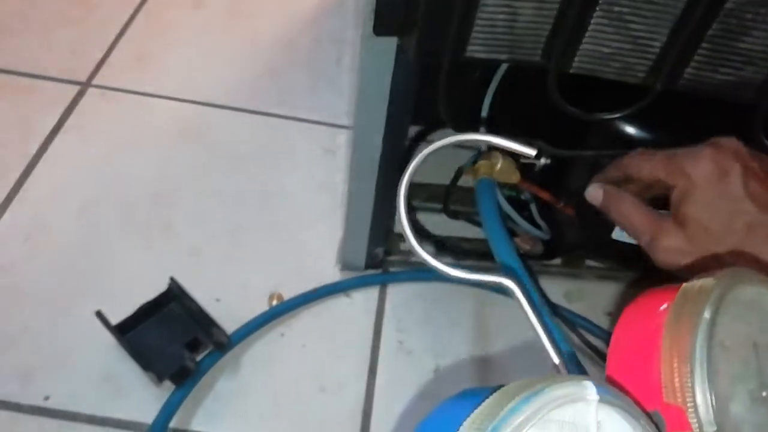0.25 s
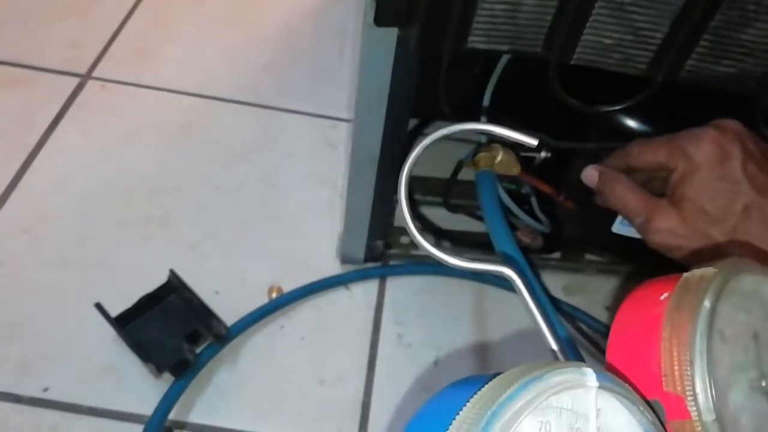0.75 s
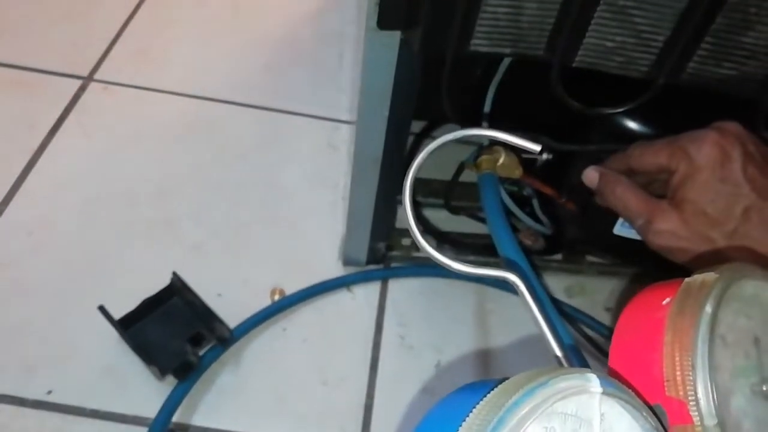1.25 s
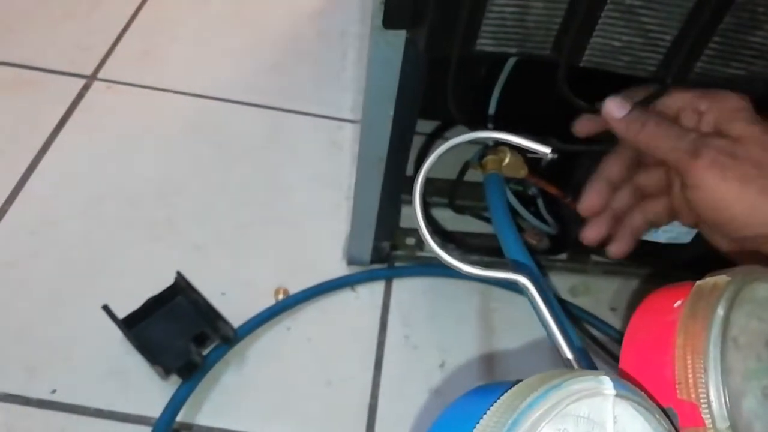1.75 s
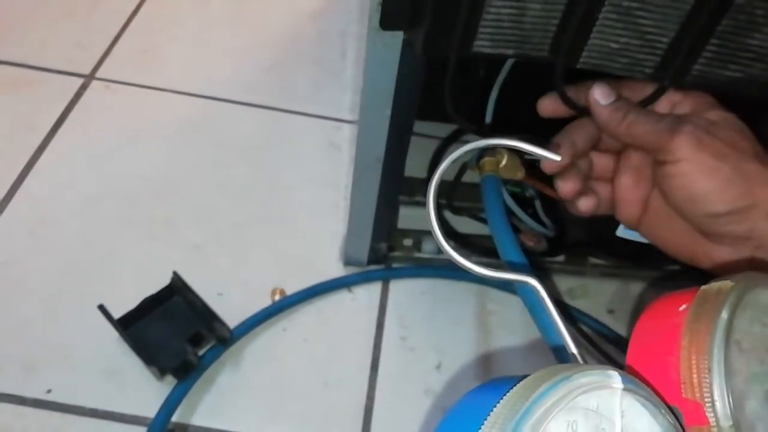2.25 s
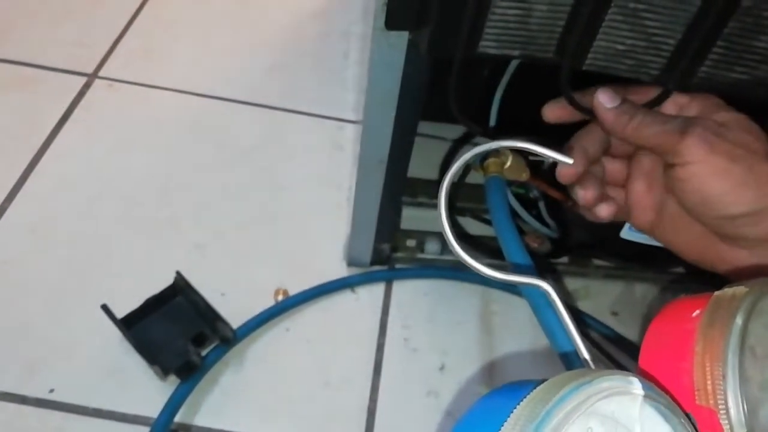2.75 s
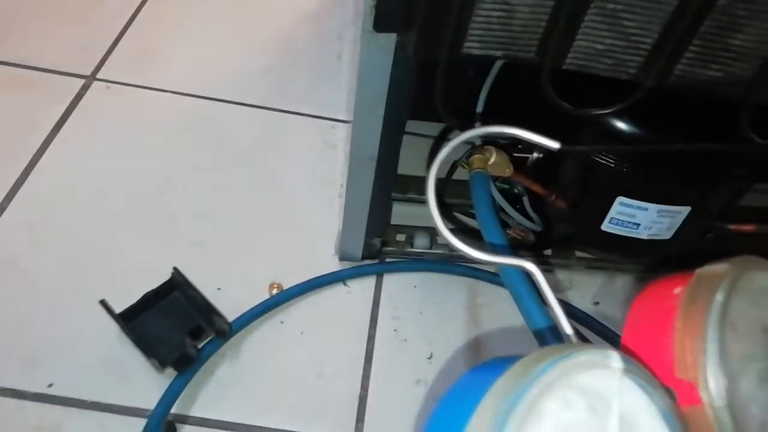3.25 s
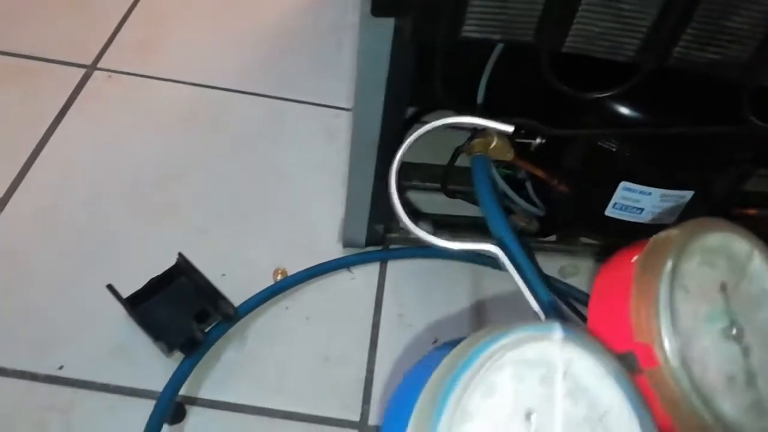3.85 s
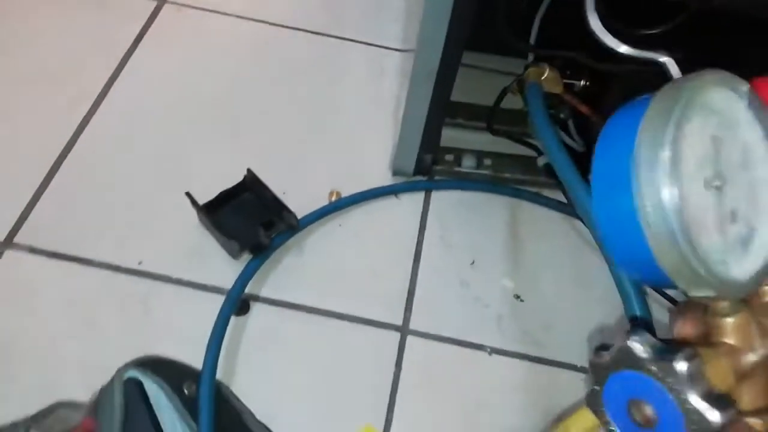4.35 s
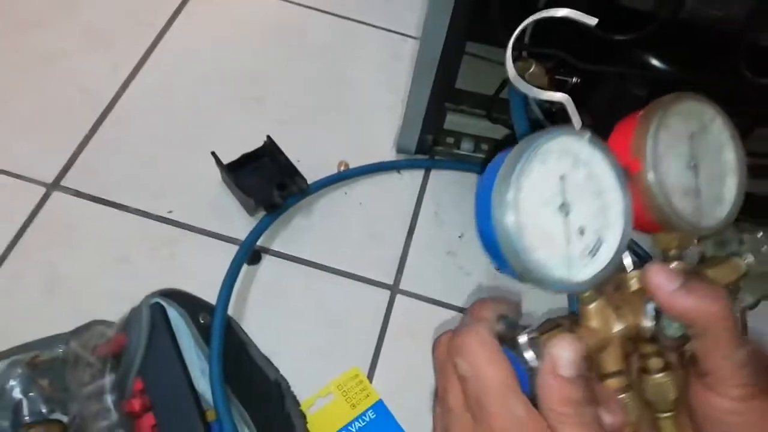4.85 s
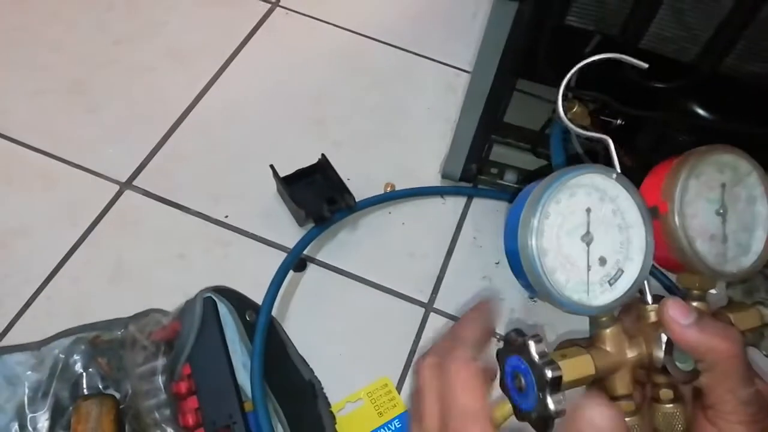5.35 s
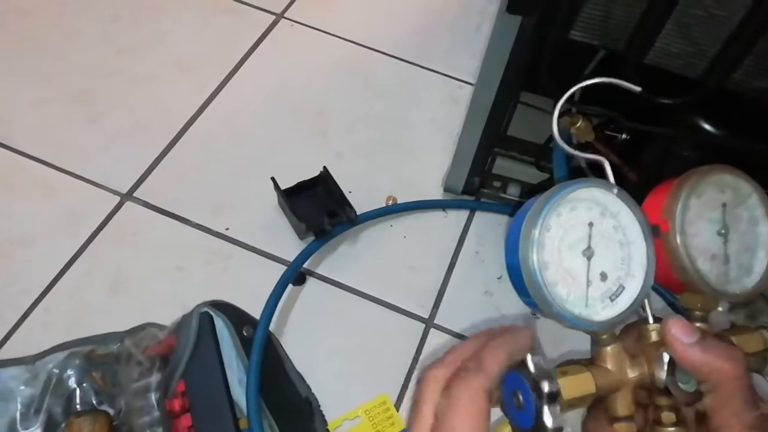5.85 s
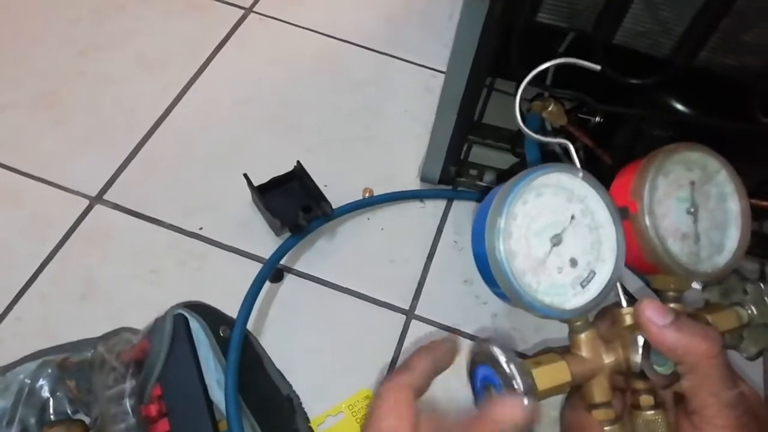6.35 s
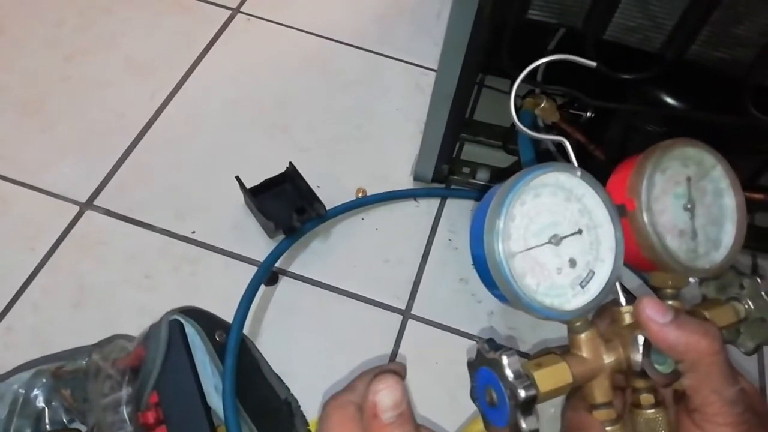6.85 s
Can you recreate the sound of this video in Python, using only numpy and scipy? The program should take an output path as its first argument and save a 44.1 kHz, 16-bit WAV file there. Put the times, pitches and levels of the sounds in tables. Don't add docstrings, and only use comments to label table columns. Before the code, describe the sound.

A refrigerator compressor hums steadily in a tiled room; metal gauges tick and clack sharply, then gas hisses and sings through pipes.

```python
import sys
import numpy as np
from scipy import signal
from scipy.fft import rfft, irfft, next_fast_len
from scipy.io import wavfile
from scipy.ndimage import uniform_filter1d, minimum_filter1d, map_coordinates

SR = 44100
rng = np.random.default_rng(int(sys.argv[2]) if len(sys.argv) > 2 else 0)


def master(y):
    cut = np.clip(np.atleast_2d(y).T, -1, 1)
    pcm = np.round(cut * 32767)
    wavfile.write(sys.argv[1], SR, pcm.astype(np.int16))


def voltage_ratio(decibels):
    exponent = np.asarray(decibels, float) / 20
    return 10 ** exponent


N = 313110
T = np.arange(N) / SR


def unit(x):
    return x / np.sqrt(np.mean(x ** 2) + 1e-20)


def along(points, hz):
    f, v = np.transpose(points)
    return np.interp(np.log(hz + 1), np.log(f + 1), v)


def curves(rows, t=T):
    s, *cols = np.transpose(rows)
    return [np.interp(t, s, c) for c in cols]


def wobble(rate_hz):
    return map_coordinates(rng.standard_normal(int(N * rate_hz / SR) + 4), [T * rate_hz])


def stroke(start_s, hold_s, rise_db_per_s, fall_db_per_s):
    early_s = np.maximum(start_s - T, 0)
    late_s = np.maximum(T - start_s - hold_s, 0)
    return -rise_db_per_s * early_s - fall_db_per_s * late_s


def filtered(x, response):
    m = next_fast_len(x.shape[-1] + 8192)
    return irfft(rfft(x, m) * response(np.fft.rfftfreq(m, 1 / SR)), m)[..., :x.shape[-1]]


def resonances(modes):
    def response(f):
        total = 0
        for k, (centre_hz, width_hz, db) in enumerate(modes):
            damping = 1j * f * width_hz
            total = total + (-1) ** k * voltage_ratio(db) * damping / (centre_hz ** 2 - f * f + damping)
        return total
    return response


def ears(pan_db):
    return voltage_ratio(np.multiply.outer([.5, -.5], pan_db))


# frequency in Hz, left-right correlation.
ALIKE = [(60, 0.89), (150, 1), (300, 0.37), (640, -0.62), (1500, 0.28), (15000, -0.12)]
# frequency in Hz, left minus right in dB.
LEAN = [(60, -1), (300, 0.5), (750, -7.5), (1300, 0), (2500, 2), (3800, 1.5), (6500, 0), (9500, 9.5),
        (15000, 2.5)]


def rush(spectrum, alike=ALIKE):
    m = next_fast_len(N)
    hz = np.fft.rfftfreq(m, 1 / SR)
    turn = np.arccos(np.clip(along(alike, hz), -1, 1)) / 2
    noise = rfft(rng.standard_normal((2, m))) * voltage_ratio(along(spectrum, hz))
    mid, side = noise * [np.cos(turn), np.sin(turn)]
    pair = np.array([mid + side, mid - side]) * ears(along(LEAN, hz))
    return unit(irfft(pair, m)[:, :N])


def add(out, s, sound):
    part = out[:, round(s * SR):][:, :sound.shape[-1]]
    part += sound[..., :part.shape[1]]


# frequency in Hz, t60 in seconds.
ROOM = [(200, 0.77), (1000, 0.42), (4000, 0.58), (10000, 0.24)]


def room(x, length=0.73):
    hz, t, z = signal.stft(rng.standard_normal((2, SR // 2)), SR, nperseg=256)
    decay = voltage_ratio(-60 * t / (length * along(ROOM, hz))[:, None])
    tail = signal.istft(z * decay, SR, nperseg=256)[1]
    tail[1] += filtered(tail[0] - tail[1], lambda f: 1 / (1 + (f / 280) ** 4))
    tail = tail / np.linalg.norm(tail[0])
    return signal.fftconvolve(x.mean(0)[None], tail, axes=1)[:, :x.shape[1]]


NEAR_S, APPROACH_DB_PER_S, FAR_DB = 6.16, 27, -25


def approach_db():
    return np.maximum(stroke(NEAR_S, 9, APPROACH_DB_PER_S, 0), FAR_DB)


# frequency in Hz, density in dB per Hz.
AIR = [(20, -26), (120, -2), (300, 4), (420, -11.5), (560, -2), (1000, -3.5), (2000, -7.5), (2500, -27.5),
       (3000, 1.5), (4000, -8.5), (5200, -10), (8000, 0.5), (10500, -10.5), (15800, -20.5)]
# frequency in Hz, density in dB per Hz.
RUMBLE = [(15, 6.5), (24, 6.5), (32, -4), (50, 7.5), (100, -3), (200, -10), (400, -41), (600, -120)]
AIR_DB, RUMBLE_DB = -59, -62.5
AIR_FOLLOWS, RUMBLE_FOLLOWS = 0.089, 0.22


def air():
    lift_db = approach_db() - FAR_DB
    hush_db = AIR_DB + AIR_FOLLOWS * lift_db + 3.8 * wobble(1.066)
    hush = voltage_ratio(hush_db) * rush(AIR)
    rumble_db = RUMBLE_DB + RUMBLE_FOLLOWS * lift_db + 1.6 * wobble(3.9) + 0.6 * wobble(1.6)
    return hush + voltage_ratio(rumble_db) * rush(RUMBLE, [(30, 1), (200, 0.75)])


# frequency in Hz, level in dB.
MAINS = [(25, -73), (99.9, -80)]


def mains():
    hum = 0
    for hz, db in MAINS:
        hum = hum + np.sqrt(2) * voltage_ratio(db + 3 * wobble(5)) * np.sin(2 * np.pi * hz * T + 1.2 * wobble(2))
    return hum


# level in dB near 55 Hz, slope in dB per Hz of revving.
FIRING = [(-55.5, -0.8), (-61, 1.3), (-62, 1.4)]
# frequency in Hz, density in dB per Hz.
ROAR = [(20, -16), (60, -15), (300, 3.5), (500, -8.5), (1000, -0.5), (1800, -10.5), (3000, -17.5),
        (5000, -11.5), (7000, -41)]
IDLE_HZ, REV_S, REV_HZ_PER_S = 47.9, 5.5, 7
PULL_S, PULL_DB_PER_S = 5.7, 90
ROAR_DB = -48.5


def engine():
    hz = IDLE_HZ + REV_HZ_PER_S * np.maximum(T - REV_S, 0)
    angle = 2 * np.pi * np.cumsum(hz) / SR
    orders = 0
    for k, (db, slope) in enumerate(FIRING, 1):
        level = voltage_ratio(db + slope * (hz - 54.5) + 3.8 * wobble(11))
        orders = orders + np.sqrt(2) * level * np.sin(k * angle)
    pull = voltage_ratio(stroke(PULL_S, 9, PULL_DB_PER_S, 0))
    near_db = stroke(NEAR_S, 9, APPROACH_DB_PER_S, 0)
    return pull * orders + voltage_ratio(ROAR_DB + near_db + wobble(8)) * rush(ROAR)


# start in seconds, peak in dB, low part in dB over it, brightest Hz, room in dB.
KNOCKS = [
    (1.656, -35, 5.5, 2360, 6.5),
    (1.756, -46, 3, 1800, 1.5),
    (2.807, -41, 3.5, 3500, 4.5),
    (2.903, -50, 9.5, 2000, 4.5),
    (3.26, -44.5, 3, 1500, -1),
    (4.153, -32, -26.5, 651, -0.5),
    (3.748, -47.5, 8.5, 1200, 5),
]
# frequency in Hz, width in Hz, level in dB.
WOOD = [(630, 370, -8), (810, 350, -2), (1278, 89, 3), (1500, 83, -2.5), (1640, 62, -4), (2200, 310, -0.5),
        (3000, 200, 5.5), (4180, 2500, -2.5), (8500, 2100, -28)]
TAIL, TAIL_PER_DB = 0.47, 0.4


def knocks():
    out, t = np.zeros((2, N)), np.arange(SR // 8) / SR
    low_modes = resonances([(189, 15, 2.5), (279, 33, -1.0), (441, 24, -4.5)])
    for s, db, low_db, top_hz, room_db in KNOCKS:
        blow = voltage_ratio(-60 * t / 0.041) * rng.standard_normal((2, len(t)))
        wood = filtered(blow[0], lambda hz: resonances(WOOD)(hz) / (1 + (hz / top_hz) ** 4))
        low = voltage_ratio(low_db) * filtered(blow[1], low_modes)
        hit = np.pad(voltage_ratio(db + 11.0) * (wood + low), (0, SR // 2))[None]
        add(out, s, hit + voltage_ratio(room_db) * room(hit, TAIL + TAIL_PER_DB * room_db))
    return out


# start in seconds, peak in dB, frequency in Hz.
THUMPS = [
    (2.857, -43, 96),
    (2.919, -43, 97),
    (2.99, -42.5, 67),
    (3.761, -36, 61),
    (3.837, -39.5, 61.1),
    (3.901, -46, 61.6),
    (6.59, -45.5, 177),
    (6.68, -43, 178),
]


def thumps():
    out, t = np.zeros((2, N)), np.arange(SR // 4) / SR
    for s, db, hz in THUMPS:
        shape = voltage_ratio(db - 60 * t / 0.28) * (1 - np.exp(-t / 0.0063))
        add(out, s, shape * np.sin(2 * np.pi * hz * t)[None])
    return out


# start in seconds, hold in seconds, level in dB.
BRUSH = [
    (1.658, 0.073, -62.5),
    (1.925, 0.033, -60.5),
    (2.176, .01, -61.5),
    (2.797, .02, -63.5),
    (2.895, 0.22, -64),
    (3.27, .01, -66.5),
    (3.742, 0.37, -67.5),
    (4.207, 0.42, -67),
]
# frequency in Hz, density in dB per Hz.
SKIN = [(1200, -27), (2500, -7), (5000, -4.5), (8300, 0.5), (10000, -5), (13000, -23), (15800, -20)]
BRUSH_RISE_DB_PER_S, BRUSH_FALL_DB_PER_S = 390, 120


def brushing():
    level = 0
    for s, hold_s, db in BRUSH:
        level = level + voltage_ratio(db + 9.5 + stroke(s, hold_s, BRUSH_RISE_DB_PER_S, BRUSH_FALL_DB_PER_S))
    return level * voltage_ratio(2.2 * wobble(60)) * rush(SKIN)


# start in seconds, hold in seconds, case level in dB,
# hiss in dB over it, case pitch in Hz.
SCRAPES = [
    (4.405, 0.088, -62.5, 3, 1130),
    (4.835, 0.012, -43, 1, 1174),
    (5.049, 0.052, -44.5, -1, 960),
    (5.098, 0.005, -43.5, 14.5, 898),
    (6.352, 0.03, -51, -0.5, 952),
    (6.407, 0.013, -44, -6, 981),
    (6.493, .005, -57, 10, 950),
]
SCRAPE_RISE_DB_PER_S, SCRAPE_FALL_DB_PER_S = 570, 212


def scraping():
    grit = voltage_ratio(2.86 * wobble(220))
    hiss = unit(grit * rush(SKIN))
    swing = filtered(grit * rng.standard_normal((2, N)), lambda f: 1 / (1 + (f / 150) ** 2))
    swing = 0.5 + 1.52 * unit(swing[0]) - .6j * unit(swing[1])
    tone, grate = 0, 0
    for s, hold_s, db, hiss_db, hz in SCRAPES:
        level = voltage_ratio(db - 1.5 + stroke(s, hold_s, SCRAPE_RISE_DB_PER_S, SCRAPE_FALL_DB_PER_S))
        tone = tone + level * np.exp(2j * np.pi * hz * T)
        grate = grate + level * voltage_ratio(hiss_db + 5.5)
    return ears(-6.5)[:, None] * (swing * tone).real + grate * hiss


# start in seconds, case peak in dB, bright crack in dB over it, struck pitch in Hz.
TICKS = [(4.392, -45, 10, 1170), (4.416, -53, 3, 1000), (4.436, -48, 11.5, 1400), (4.475, -44.5, 9, 1060),
         (4.501, -47, 8, 1200), (4.567, -51, -2, 970), (4.77, -31.5, 9, 894), (4.819, -42, 12, 1230),
         (4.844, -37, -1, 1170), (4.862, -40, 11, 1160), (4.9, -35.5, 7, 1110), (5.026, -32, 2.5, 1120),
         (5.038, -27.5, 0, 1005), (5.059, -31.5, 11.5, 1030), (5.073, -29, 3, 945), (5.082, -29, 1, 970),
         (5.102, -16, -1, 1020), (5.112, -21, -1, 850), (5.135, -21, 5, 960), (5.155, -25, -6, 980),
         (5.164, -31, -3, 890), (5.206, -41, -5, 885), (5.224, -32.5, 3, 970), (5.33, -45, -8, 970),
         (5.365, -43, 12, 1010), (5.374, -39, 3, 1030), (5.466, -34.5, 6, 1000), (5.474, -30, 0, 960),
         (5.496, -36.5, -1, 970), (5.524, -40, -14, 910), (5.607, -36.5, -17, 980), (5.691, -32, -0.5, 990),
         (5.723, -35, -2, 970), (5.814, -30, 2, 970), (5.926, -42, -11, 970), (5.972, -43, -9, 980),
         (6.048, -37.5, -21, 1003), (6.081, -41, -10, 1020), (6.129, -49, 7, 947), (6.32, -40, -1, 1040),
         (6.351, -30, 2, 910), (6.374, -36.5, 9, 975), (6.391, -35.5, 9, 960), (6.419, -30.5, -5, 945),
         (6.45, -36, 3, 970), (6.474, -27.5, -15, 970), (6.503, -40, -4, 890)]
# frequency in Hz, width in Hz, level in dB.
CASE = [(709, 41, 1), (812, 102, -1), (970, 89, 1.5), (1120, 175, -8.5), (1440, 132, -0.5), (1690, 25, -10),
        (2210, 20, -3), (3250, 110, -6)]
# frequency in Hz, density in dB per Hz.
SNAP = [(1000, -14.5), (1700, 0.5), (3200, 0), (4500, -3), (6000, -14), (8500, -2.5), (11000, -45),
        (15800, -36)]
CASE_PAN_DB, PAN_PER_CRACK = -4.5, 0.21


def ticking():
    (taps, snaps), t = np.zeros((2, 2, N)), np.arange(SR // 5) / SR
    for s, db, crack_db, hz in TICKS:
        pan_db = CASE_PAN_DB + PAN_PER_CRACK * crack_db
        shape = voltage_ratio(db + 21.5 - 60 * t / 0.014) * (1 - np.exp(-t / 0.0014))
        tap = .5 * rng.standard_normal(len(t)) + 0.42 * np.cos(2 * np.pi * hz * t)
        add(taps, s - .0015, ears(pan_db)[:, None] * shape * tap)
        snap = voltage_ratio(db + crack_db - 8.5 - 60 * t / 0.042) * rng.standard_normal((2, len(t)))
        add(snaps, s, ears(pan_db + 3.0)[:, None] * snap)
    body = filtered(taps, lambda f: resonances(CASE)(f) * (1j * f / (520 + 1j * f)) ** 2)
    return body + voltage_ratio(4.5) * filtered(snaps, lambda hz: voltage_ratio(along(SNAP, hz)))


# start in seconds, peak in dB, left minus right in dB.
CLACKS = [
    (4.8834, -18, -2.5),
    (5.0257, -29, 6),
    (5.0397, -37, 7),
    (5.062, -30, 0),
    (5.0995, -5, 2.5),
    (5.3653, -34, 2),
    (5.472, -26, 13.5),
]
# frequency in Hz, density in dB per Hz.
CRACK = [(1200, -37), (2500, -5), (4000, -5.5), (5500, -9), (7000, -5.5), (8300, 0.5), (9800, -15),
         (12000, -25), (15800, -26)]
# frequency in Hz, level in dB, t60 in seconds.
BRASS = [(4980, -6, 0.046), (5900, -7, 0.037), (7500, -1.5, 0.038), (7780, 1.5, 0.052), (8130, 3, 0.061),
         (8450, 2, 0.047), (8930, 5, 0.042), (9460, -2, 0.04), (9810, -7.5, 0.074), (11600, 0.5, 0.016)]


def clacking():
    (cracks, brass), t = np.zeros((2, 2, N)), np.arange(SR // 5) / SR
    for s, db, pan_db in CLACKS:
        pan = ears(pan_db)[:, None]
        shape = voltage_ratio(db + 2.5 - 60 * t / 0.019) * (1 - np.exp(-t / 0.00067))
        add(cracks, s, pan * shape * rng.standard_normal((2, len(t))))
        ring = 0
        for hz, level_db, t60_s in BRASS:
            rough_db = 4.5 * unit(uniform_filter1d(rng.standard_normal((2, len(t))), size=90, axis=1))
            phase = rng.uniform(0, 2 * np.pi, (2, 1))
            ring = ring + voltage_ratio(level_db + rough_db - 60 * t / t60_s) * np.sin(2 * np.pi * hz * t + phase)
        add(brass, s, pan * voltage_ratio(1.66 * db - 10.0) * ring)
    return voltage_ratio(3.0) * filtered(cracks, lambda hz: voltage_ratio(along(CRACK, hz))) + brass


# start in seconds, peak in dB, frequency in Hz, t60 in seconds.
PINGS = [(1.655, -49, 1306, .3), (1.662, -45.5, 190.7, 0.41), (1.67, -50.5, 731, 0.18),
         (1.658, -42, 2010, 0.091), (1.665, -43.5, 1630, 0.17), (1.667, -46.5, 2127, 0.18),
         (1.664, -43, 3020, 0.06), (1.72, -47, 1440, 0.18), (1.754, -46, 1240, 0.097),
         (2.808, -44.5, 840, 0.067), (2.907, -50, 1860, 0.12), (2.91, -56, 1297, 0.38),
         (3.259, -45.5, 1110, 0.012), (1.668, -48, 284, 0.2), (4.486, -45, 3960, .05),
         (4.772, -36.5, 3180, 0.046), (4.812, -35.5, 4200, 0.036), (4.826, -35.5, 4180, .05),
         (4.828, -38.5, 8470, 0.045), (4.884, -46, 2460, .04), (5.059, -32, 5900, .03),
         (5.075, -34, 3880, .05), (5.0992, -23.5, 2754, 0.077), (5.133, -36, 2750, 0.12),
         (5.132, -29, 5900, 0.027), (5.226, -39, 2784, 0.048), (5.365, -36, 3180, 0.038),
         (5.471, -30, 3450, 0.019), (6.387, -37, 3570, 0.032), (6.375, -42, 1710, 0.033)]


def pings():
    out, t = np.zeros((2, N)), np.arange(SR // 4) / SR
    for s, db, hz, t60_s in PINGS:
        rough = voltage_ratio(3.4 * unit(uniform_filter1d(rng.standard_normal((2, len(t))), size=300, axis=1)))
        shape = voltage_ratio(db - 60 * t / t60_s) * (1 - np.exp(-t / 0.0013))
        add(out, s, rough * shape * np.sin(2 * np.pi * hz * t + [[0], [.8]]))
    return out


# frequency in Hz, width in Hz, level in dB.
PIPES = [(7900, 80, -6), (8210, 36, -2), (8500, 40, 0), (8920, 70, -6), (9440, 36, 4), (10800, 150, -14)]
# frequency in Hz, width in Hz, level in dB.
PIPES_COLD = [(7550, 60, -4), (8150, 65, -5), (8490, 42, -1), (8870, 55, -3), (9370, 42, 4),
              (10200, 130, -9)]
# frequency in Hz, density in dB per Hz.
JET = [(1760, -55), (3000, -44), (3410, -24), (3720, -17.5), (5460, -14.5), (9170, -2.5), (9950, -11.5),
       (13700, -17.5), (15000, -36)]
VALVE_OPEN_S, FLOW_DB, FLOW_DB_PER_S = 6.435, -37.5, 46
CHILL_S, SING_DB_PER_S = (6.6, 6.85), 56


def valve():
    wide = [(3000, 0.076)]
    cold = np.interp(T, CHILL_S, (0, np.pi / 2))
    warm = unit(filtered(rush(JET, wide), resonances(PIPES)))
    chilled = unit(filtered(rush(JET, wide), resonances(PIPES_COLD)))
    sing_db = stroke(VALVE_OPEN_S, 9, SING_DB_PER_S, 0) + 2.8 * wobble(16)
    sung = voltage_ratio(sing_db) * (np.cos(cold) * warm + np.sin(cold) * chilled)
    flow_db = FLOW_DB - 3.5 + stroke(VALVE_OPEN_S, 9, FLOW_DB_PER_S, 0) + 0.59 * wobble(22)
    return voltage_ratio(flow_db) * (sung + voltage_ratio(0.5) * rush(JET, wide))


SHAFT_HZ = 49.213
# frequency in Hz, width in Hz, level in dB.
RINGING = [(2026, 260, 7.5), (3020, 330, 7), (5470, 110, -2), (5790, 200, 0), (6840, 130, 9.5),
           (7710, 120, -9), (8220, 83, 1), (8260, 150, -2), (8800, 84, -5), (9480, 190, 5.5),
           (10200, 230, -3)]
# time in seconds, loss in dB.
RETREAT = [(0, 0.5), (3.9, 0), (4.5, 0), (5.1, 4), (5.7, 2.5), (6.2, 1.5), (7.1, 3)]


def gas_pulses():
    turn = 2 * np.pi * SHAFT_HZ * T
    puff = 1 + 0.62 * np.cos(2 * turn) + 0.32 * np.cos(turn)
    near_db = -curves(RETREAT)[0]
    level = voltage_ratio(-63.5 + 0.13 * near_db + wobble(0.19))
    return level * unit(filtered(puff * rush([(20, 0)]), resonances(RINGING)))


# multiple of SHAFT_HZ, left in dB, right in dB.
ORDERS_DB = [(1, -62, -62), (2, -61, -61), (3, -72, -72), (4, -71, -71), (5, -70, -69), (6, -72, -73),
             (13, -76, -62), (14, -76, -77), (23, -75, -81), (40, -79, -70), (41, -82, -75), (42, -70, -69),
             (43, -73, -62), (45, -72, -72), (47, -74, -82), (55, -71, -84), (56, -55, -64), (57, -76, -86),
             (59, -71, -67), (60, -66, -74), (61, -75, -79), (62, -61, -79), (63, -68, -82), (64, -74, -82),
             (65, -76, -79), (66, -74, -81), (94, -72, -78), (95, -74, -71), (113, -75, -84),
             (114, -72, -86), (119, -72, -74), (122, -71, -77), (123, -68, -78), (124, -71, -77),
             (133, -72, -79), (134, -73, -81), (138, -59, -61), (139, -69, -76), (140, -70, -71),
             (142, -75, -76), (143, -71, -71), (151, -69, -70), (152, -68, -71), (153, -71, -77),
             (154, -67, -74), (156, -74, -80), (157, -72, -81), (160, -74, -78), (161, -76, -79),
             (165, -72, -72), (166, -73, -77), (170, -73, -81), (171, -75, -87), (172, -74, -81),
             (173, -75, -86), (182, -71, -82), (183, -76, -88), (194, -75, -85), (207, -75, -93),
             (208, -76, -88)]
# frequency in Hz, level in dB each.
SHELL = [(220.0, -75.5), (690.0, -94.5), (1380.0, -85.5), (2070.0, -97), (2510.0, -110), (3000.0, -110),
         (3890.0, -79.5), (4870.0, -79), (5860.0, -82), (7140.0, -83), (8490.0, -84.5), (9770.0, -90.5),
         (11100.0, -110)]
SWELL_ORDERS = [138, 138, 152, 152, 41, 41, 42, 43, 43, 94, 94, 62, 13, 56, 154, 6, 7, 2, 6, 172, 2, 63, 3,
                4, 5, 165, 138]
# centre in seconds, half length in seconds, left
# in dB, right in dB.
SWELLS = [(0.43, 0.92, -18, -6), (3.46, 0.15, -1, 11), (0.56, .4, -2, -8), (4.62, 0.98, 11, 9.5),
          (2.2, .3, -4, 15), (6.88, 0.68, 27.5, 2), (6.5, 0.51, -7, -16), (0.7, 0.45, -15, -10),
          (5.0, 1.12, 19, 6.5), (1.44, 0.63, 10, 7), (2.7, 1.2, -1, 5), (6.1, 1.5, -14, -8),
          (7.2, 0.64, -4, -13), (6.75, 1.04, -8, -10), (5.53, 0.33, 0, 19), (0.62, 0.9, 2.5, 7),
          (.6, 0.88, 10, 3), (0.36, 0.94, -3.5, -3.5), (5, 2.6, -7, -6), (6.9, 0.63, 12, 19),
          (6.9, 1.5, 5, 4.5), (4.9, .7, 4, 10), (5.5, 3.8, -4, -5.5), (4.4, 1.9, -3, -7),
          (4.05, 0.54, -2.5, -2.5), (4.3, 1.3, 11, -1), (2, 0.8, 2.5, 5)]
# frequency in Hz, share of the loss.
LOSS_SHARE = [(110, 0.083), (140, 0.63), (640, 2), (2100, 0.043), (2700, 1.26), (3100, 0.18), (7000, 1.12)]
# multiple of SHAFT_HZ, left lead in radians.
LEADS = [(3, -.5), (4, -.5), (5, -1), (6, -1.1), (42, .3), (45, 2), (59, 1.8), (94, 1.9), (95, 3.1),
         (119, .5), (122, 2.7), (138, -2.3), (140, -2.5), (143, 2), (151, -.4), (154, .1), (165, .1),
         (13, 0), (43, 2), (56, 1.8)]
BEAT_DB, BEAT_HZ, BEAT_PEAK_S = 5, 1.46, 4.29


def compressor(size=4096, top=240):
    knots_s, k = np.arange(0, N / SR + .2, .1), np.arange(top)
    hz = k * SHAFT_HZ
    shell_db = 4 + 12 * np.log10(np.abs(resonances(RINGING)(hz + 1))) * (k > 36)
    scatter_db = 3.03 * np.clip(rng.standard_normal((2, top)), -3, .3)
    db = along(SHELL, hz) + scatter_db + shell_db + np.outer([.5, -.5], along(LEAN, hz))
    for order, left_db, right_db in ORDERS_DB:
        db[:, int(order)] = left_db, right_db
    loss_db, = curves(RETREAT, knots_s)
    drift_db = np.tile(-np.outer(loss_db, along(LOSS_SHARE, hz)), (2, 1, 1))
    for order, (s, half_s, *gain_db) in zip(SWELL_ORDERS, SWELLS):
        drift_db[..., order] += np.outer(gain_db, np.exp(-((knots_s - s) / half_s) ** 4))
    drift_db[..., 2] += BEAT_DB * np.cos(2 * np.pi * BEAT_HZ * (knots_s - BEAT_PEAK_S))
    slow = 2 * uniform_filter1d(rng.standard_normal((2, 2, len(knots_s), top)), size=4, axis=2)
    slow[:, 1, :, :9] = slow[:, 0, :, :9]
    wander = np.outer(0.54 + 0.034 * loss_db, np.clip(k / 90, .3, 1))
    apart = rng.uniform(-1.29, 1, (2, top)) * np.pi * np.clip(k / 16, 0, 1) ** 2
    for order, lead in LEADS:
        apart[:, int(order)] = lead / 2, -lead / 2
    phase = rng.uniform(0, 2 * np.pi, top) + apart[:, None] + 0.071 * wander * slow[0] * (k > 6)
    level = voltage_ratio(db[:, None] + drift_db + 4.74 * wander * slow[1]) * (k > 0)
    turns = irfft(level * np.exp(1j * phase), size) * size / np.sqrt(2)
    angle = np.cumsum(SHAFT_HZ * (1 + 0.000215 * wobble(2.975))) / SR % 1 * size
    closed = np.pad(turns, ((0, 0), (0, 0), (0, 1)), "wrap")
    return np.array([map_coordinates(turn, [T * 10, angle], order=1) for turn in closed])


def scene():
    near = ticking() + clacking() + scraping() + pings()
    machine = compressor() + gas_pulses() + mains()
    handling = air() + brushing() + near + voltage_ratio(-4.5) * room(near, 0.81)
    return machine + handling + knocks() + thumps() + valve() + engine()


# frequency in Hz, share of the time in quiet, share under the hiss.
STARVED = [(2150, 0, 0), (2350, .05, .55), (2500, .2, .55), (2650, 0, .1), (3150, 0, .25), (3500, .45, .6),
           (4050, .2, .4), (4350, .4, .7), (4550, 0, .45), (4750, 0, .3), (5100, .5, .4), (5500, .05, .4),
           (5800, 0, .05), (6500, .03, .15), (6800, 0, 0), (14300, 0, 0), (14500, 0, .95)]
STARVE_S = 6.48


def starved(x, size=1024):
    hz, t, z = signal.stft(x, SR, nperseg=size)
    luck = uniform_filter1d(rng.standard_normal(z.shape[1:]), size=9, axis=0)
    luck = uniform_filter1d(luck, size=5, axis=1)
    rank = luck.argsort(None).argsort().reshape(luck.shape) / luck.size
    f, quiet, busy = np.transpose(STARVED)
    share = np.where(t > STARVE_S, np.interp(hz, f, busy)[:, None], np.interp(hz, f, quiet)[:, None])
    power = np.abs(z[:, (hz > 2000) & (hz < 6000)]).sum((0, 1))
    floor = uniform_filter1d(minimum_filter1d(power, size=15), size=15)
    steady = power < 2.1 * floor
    return signal.istft(z * ((rank >= share) | ~steady), SR, nperseg=size)[1][:, :N]


def top_cut(x):
    return signal.sosfilt(signal.butter(12, 15700, fs=SR, output="sos"), x)


def record(dry):
    mix = starved(np.clip(dry, -1, 1))
    return top_cut(mix)


dry = scene()
out = record(dry)
master(out)
```